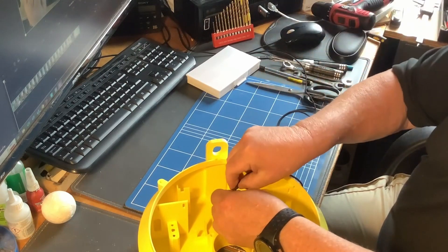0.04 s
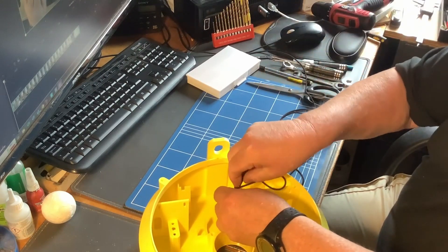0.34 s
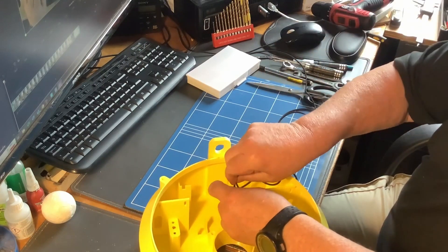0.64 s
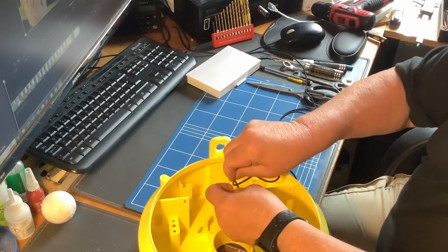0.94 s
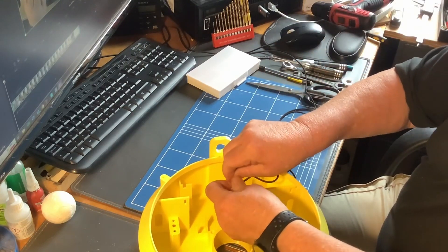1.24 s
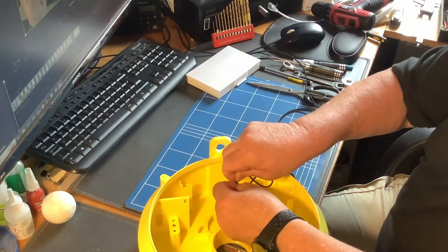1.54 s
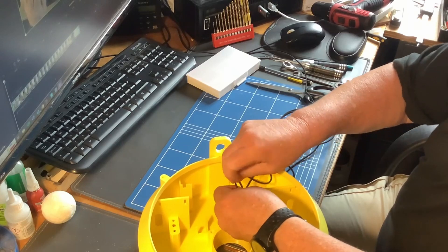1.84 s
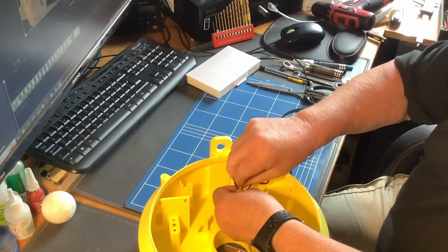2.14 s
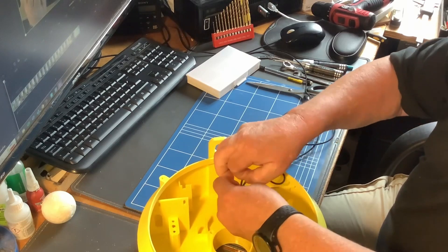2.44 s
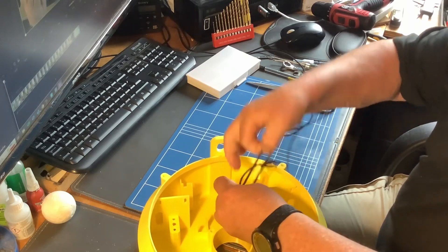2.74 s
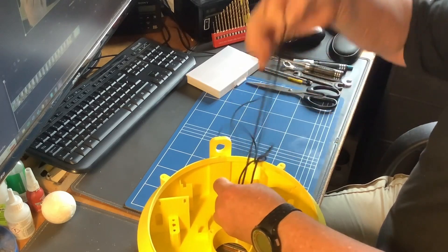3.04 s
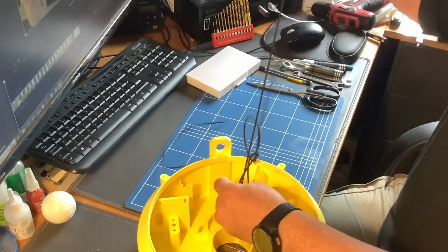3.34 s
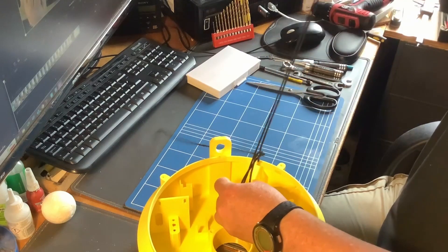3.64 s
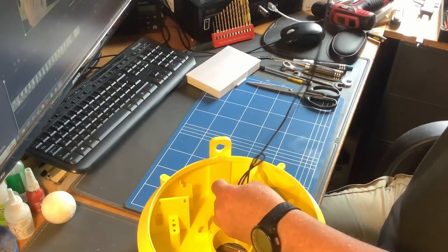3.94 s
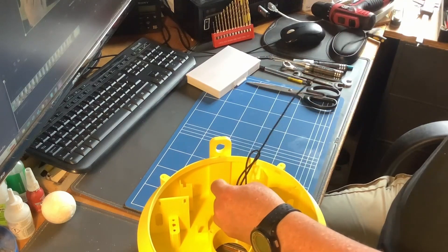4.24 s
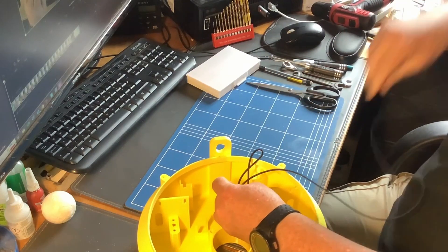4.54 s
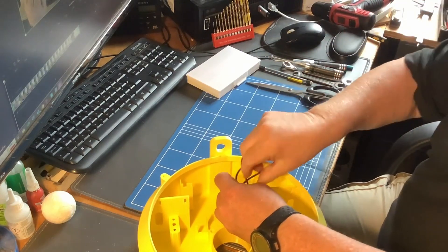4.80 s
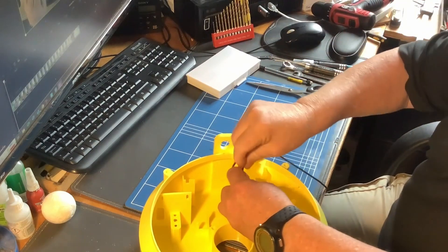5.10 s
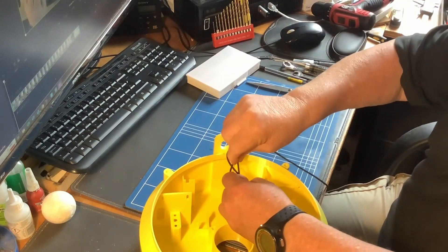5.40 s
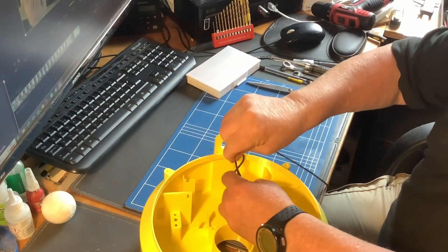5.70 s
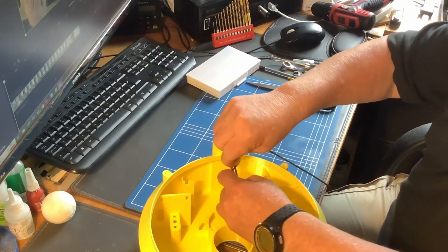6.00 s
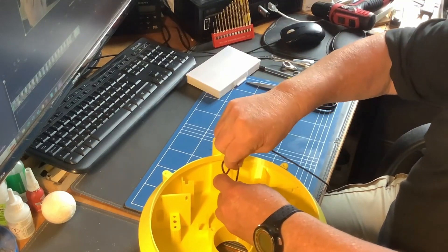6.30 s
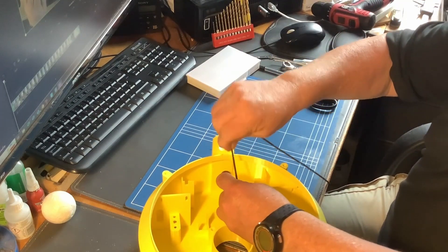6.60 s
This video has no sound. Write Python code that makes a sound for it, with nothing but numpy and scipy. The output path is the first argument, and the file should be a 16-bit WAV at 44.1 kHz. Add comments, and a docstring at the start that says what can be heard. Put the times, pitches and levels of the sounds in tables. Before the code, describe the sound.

In a small, quiet room, a nearby microphone picks up soft handling of a plastic shell, on the left channel only. A stretchy cord scrapes through the shell in one long, jerky pull, bright and raspy with short squeals, and its end taps the plastic several times. Afterwards fingers scuff and rub more quietly, with occasional light ticks and dull thuds as the shell rocks on the desk.

```python
"""A braided bungee cord is fed by hand through a hole in a plastic housing, then hauled through in jerks. The
braid rasps over the edge in tiny slips that ring the bowl-shaped shell, and it squeals briefly when the slips
fall into step. The loose end flicks against the plastic, and the housing bumps on its desk. Fingers rub, scuff
and now and then squeak before and after, in a small quiet room. Only the left channel carries sound."""
import sys
import numpy as np
from scipy import signal
from scipy.fft import rfft, irfft
from scipy.io import wavfile
from scipy.ndimage import uniform_filter1d

SR = 44100
rng = np.random.default_rng(int(sys.argv[2]) if len(sys.argv) > 2 else 0)


def wav_record(signal):
    """Record a signal, one row per channel, as 16-bit PCM in the file named by sys.argv[1]."""
    frames = np.transpose(np.atleast_2d(signal))
    bounded = np.clip(frames, -1, 1)
    # unit amplitude maps onto the largest positive 16-bit level
    quanta = np.round(bounded * 32767).astype(np.int16)
    wavfile.write(sys.argv[1], SR, quanta)


N = 293706
TIME = np.arange(N) / SR
HZ = np.fft.rfftfreq(8192, 1 / SR)

# tone of the braid rasping on the edge: (frequency [Hz], level [dB])
RASP_TONE = [(40, -47.5), (200, -22), (600, -12.5), (950, -10.5), (1300, 2.5), (2000, -0.5), (2500, 3),
             (3300, -1.5), (5500, -4), (6800, -13), (10000, -16), (16000, -26)]
# tone of fibres and hands brushing the plastic: (frequency [Hz], level [dB])
SWISH_TONE = [(40, -11.5), (130, -2.5), (600, -3), (1200, -7.5), (2500, -9), (4000, -7), (5700, -11),
              (7000, -14.5), (10000, -16), (16000, -30)]
# one long haul of the arm, which speeds up and eases off: (time [s], level [dB])
HAUL = [(2.46, -53.5), (2.56, -47), (2.63, -36.5), (2.74, -35.5), (2.82, -32.5), (3.3, -32.5),
        (3.41, -43.5), (3.5, -35), (3.62, -49), (3.83, -52)]


def drag():
    """The braid slips over the edge of the hole and rings the shell, while its fibres hiss past."""
    pull_db = np.interp(TIME, *np.transpose(HAUL), left=-120, right=-120)
    force = slips(N, per_s=1800, spread_db=3) * amp(pull_db - 0.5 + 1.4 * wander(N, hz=60))
    fibres = rng.standard_normal(N) * amp(pull_db - 14)
    rasp = signal.oaconvolve(force, shell(RASP_TONE))
    hiss = signal.oaconvolve(fibres, shell(SWISH_TONE, tilt_db=4.5))
    return (rasp + hiss)[:N]


def jerks():
    """The cord snatches forward, its strands catching and letting go in clumps."""
    # (start [s], length [s], level [dB], pitch of the contact [Hz])
    snatches = [(2.755, 0.022, -27, 5000), (2.792, 0.035, -18.5, 4960), (2.84, 0.049, -28, 5300),
                (2.924, 0.072, -19.5, 2250), (2.978, 0.041, -19.5, 4380), (3.041, 0.0077, -22, 5350),
                (3.084, 0.029, -26.5, 5300), (3.108, 0.041, -19.5, 5310), (3.218, 0.069, -20, 2460),
                (3.305, 0.044, -24, 3620), (3.435, 0.034, -32, 2590), (3.515, 0.039, -22, 3060),
                (3.717, 0.073, -21, 4880), (3.795, 0.029, -23, 3680)]
    out = np.zeros(N)
    for start, length, db, hz in snatches:
        size = int(length * SR)
        catching = amp(1.2 * wander(size, hz=303))
        tilt_db = 0.62 + 0.27 * (db + 25) + 1.32 * (start - HAUL[0][0])  # harder or later is brighter
        ring = shell(RASP_TONE, tilt_db, contact(hz, width_hz=370, lift_db=8))
        strands = slips(size, per_s=3600, spread_db=2)
        add(out, start, stroke(unit(catching * strands), ring, db, taper=0.54))
    return out


def squeals():
    """Now and then the slips fall into step and form a short, unsteady whistle with its octave; the two low
    ones are fingers squeaking on the plastic."""
    # (start [s], length [s], rate of slips [Hz], level [dB])
    whistles = [(2.211, 0.056, 778, -50), (2.803, 0.038, 2445, -16), (2.918, 0.036, 2387, -17),
                (2.993, .032, 2430, -15.5), (3.133, 0.024, 2078, -18), (3.213, .02, 577, -34),
                (3.259, 0.035, 2416, -20.5), (3.538, 0.014, 2443, -23), (3.737, 0.0081, 2460, -16.5),
                (3.764, 0.016, 2462, -18), (3.801, 0.0059, 2400, -12.5)]
    out = np.zeros(N)
    for start, length, hz, db in whistles:
        size = int(length * SR)
        phase = 2 * np.pi * np.cumsum(hz * (1 + 0.043 * wander(size, hz=501))) / SR
        whistle = np.sin(phase) + amp(-15) * np.sin(2 * phase)
        add(out, start, amp(db) * unit(whistle) * np.hanning(size))
    return out


def slips(size, per_s, spread_db):
    """The force of rubbing: tiny slips at random moments, a few much larger than the rest."""
    sizes = amp(spread_db * np.minimum(rng.exponential(1, size), 3)) * rng.choice([-1, 1], size)
    return unit(sizes * (rng.random(size) < per_s / SR))


def stroke(force, ring, db, taper):
    """A short force swells and fades, ringing the shell."""
    swell = signal.windows.tukey(len(force), np.clip(taper, 0, 1))
    return amp(db) * signal.fftconvolve(force * swell, ring)


def contact(hz, width_hz, lift_db):
    """The place of contact favours one band of pitches; gives the boost in dB."""
    return lift_db / (1 + (2 * (HZ - hz) / width_hz) ** 2)


def shell(tone, tilt_db=0, contact_db=0, ringing=1):
    """The plastic shell rings under a force; sharper contact adds treble (tilt_db per octave)."""
    # pitches at which the shell rings: (frequency [Hz], width [Hz], boost at full ringing [dB])
    resonances = [(470.4, 28, 8), (540, 15, 6), (813, 59, 10.5), (1116, 11.7, 13.5), (1222, 22, 9.5),
                  (1343, 16, -2.5), (1438, 24, 9.5), (1745, 51, 5.5), (1970, 7, 8), (2072, 78, 5),
                  (2200, 30, 6), (2480, 164, 6), (2760, 30, 2), (3076, 30, -1), (3128, 35, 5.5),
                  (3646, 40, 4.5), (3640, 26, 8), (4070, 72, 3.5), (4944, 27, 5), (5290, 36, 6),
                  (5880, 96, 5)]
    peaks = sum((amp(ringing * db) ** 2 - 1) / (1 + (2 * (HZ - hz) / width) ** 2)
                for hz, width, db in resonances)
    peaks_db = 10 * np.log10(np.maximum(1 + peaks, .1))
    octaves = np.log2(np.maximum(HZ, 500) / 500)
    return response(read(tone, HZ) + peaks_db + tilt_db * octaves + contact_db)


def taps():
    """Each tap of cord or fingernail rattles among the ribs, knocks the bowl and has its own echoes."""
    # (time [s], level [dB], brightness [dB per octave], time to fade by 60 dB [s], bowl knock [dB])
    hits = [(.094, -57, 4, .044, 7), (.114, -49, 11, .025, 9), (.147, -36.5, 5, 0.02, 3.5),
            (.17, -41, -1, .041, 6), (.645, -49, 10, 0.022, 10), (2.039, -55, -11, 0.073, 4),
            (2.101, -42, 3.5, 0.024, -11), (2.159, -48.5, 3, 0.023, 0.5), (2.379, -39.5, 0, 0.084, -2.5),
            (2.468, -42, 2, 0.031, -1), (2.501, -31.5, -2.5, 0.02, -3.5), (2.601, -33.5, 1.5, 0.054, -6),
            (2.958, -24, 4, 0.023, -33), (3.677, -47, -6, .045, -3), (3.71, -30.5, 0.5, 0.1, -24),
            (3.7864, -18.5, 12.5, 0.015, -27), (3.802, -24, 0.5, 0.053, -16), (3.936, -31, 4, 0.026, -5.5),
            (4.0275, -24.5, 0, 0.026, -9.5), (4.226, -44.5, -1, .06, -13), (4.579, -45.5, 6.5, 0.2, -6),
            (4.755, -35, 4, 0.059, -5), (5.474, -43.5, 4.5, 0.058, -6.5), (5.702, -50.5, 1, 0.056, -16),
            (6.215, -55, -3.5, 0.045, 3.5), (6.378, -48, 23.5, 0.039, -28.5)]
    # tone of a tap: (frequency [Hz], level [dB])
    tick_tone = [(40, -37.5), (200, -12), (400, -12), (750, -11), (1000, -3.5), (1400, 1.5), (3000, 1),
                 (5500, -6), (7000, -12), (11000, -20), (16000, -32.5)]
    rise_s = 0.0032  # the soft cord takes a moment to press home
    out, t = np.zeros(N), TIME[:SR // 12]
    for start, db, tilt_db, fade_s, knock_db in hits:
        blow = rng.choice([-1., 1.], len(t)) * (1 - np.exp(-t / rise_s)) * amp(-60 * t / fade_s)
        ring = signal.fftconvolve(blow / np.linalg.norm(blow), shell(tick_tone, tilt_db, ringing=.2))
        add(ring, .002, amp(knock_db) * bowl(uneven_db=2, damping=1.4))  # the bowl answers just after
        tap = amp(db) * ring / np.std(ring[:SR // 100])
        add(out, start, room(tap, early_db=1.5, early_fade_s=0.039, late_db=-6.5))
    return out


def bowl(damping, uneven_db=0):
    """The whole bowl knocks hollowly; uneven_db varies its mix of tones with the place struck."""
    # tones of the bowl: (frequency [Hz], level [dB], time to fade by 60 dB before damping [s])
    tones = [(364, -11.5, 0.18), (444.5, -8, 0.15), (595, -11.5, .06), (725.8, -5, 0.15),
             (805.6, -7.5, 0.13), (1211, -5.5, 0.13), (1317, 2, 0.061), (1862, -4, 0.09), (2268, -8, 0.048),
             (3092, -7.5, 0.028)]
    t = TIME[:len(HZ)]
    place_db = uneven_db * rng.standard_normal(len(tones))
    ring = np.zeros(len(t))
    for k, (hz, db, fade_s) in enumerate(tones):
        fade = amp(db + place_db[k] - 60 * damping * t / fade_s)
        ring += (-1) ** k * fade * np.sin(2 * np.pi * hz * t)  # neighbouring tones swing opposite ways
    return ring / np.linalg.norm(ring)


def scuffs():
    """Hand and cord brush quickly over the plastic."""
    # (start [s], length [s], level [dB], brightness [dB per octave], pitch of the contact [Hz])
    brushes = [(0.138, 0.025, -48.5, 0, 1230), (.255, 0.041, -51.5, -9, 495),
               (2.385, 0.033, -42.5, -4, 750), (4.747, 0.053, -33.5, 2.5, 628), (4.767, .011, -19, 6, 5650),
               (4.797, 0.087, -40, 2.5, 2290), (5.002, 0.018, -41, 5.5, 5630),
               (5.03, 0.043, -44, -0.5, 1106), (5.075, 0.03, -40, 3.5, 3160)]
    out = np.zeros(N)
    for start, length, db, tilt_db, hz in brushes:
        ring = shell(SWISH_TONE, tilt_db, contact(hz, width_hz=0.15 * hz, lift_db=12))
        force = slips(int(length * SR), per_s=4000, spread_db=5.5)
        add(out, start, stroke(force, ring, db, taper=0.23))
    return out


def fingers(pressure):
    """Skin rubs dully on the shell and stirs the bowl while the fibres of the braid crackle above it."""
    # rubs of fingers and cord: (start [s], length [s], level [dB], crackle relative to that level [dB])
    rubs = [(0, 0.056, -54, 9), (0.124, 0.074, -44.5, 2), (0.236, 0.15, -52.5, 0), (0.423, .1, -45, -5.5),
            (0.476, 0.068, -57.5, 7.5), (0.633, 0.04, -50, -9), (1.157, 0.054, -63, -12),
            (1.349, 0.055, -51.5, -11), (1.723, 0.053, -77, -3), (2.1, 0.15, -56.5, 2),
            (2.357, 0.15, -41.5, -12), (4.45, 0.08, -42, 4.5), (4.797, 0.18, -42.5, 5.5),
            (4.961, 0.097, -44.5, 0), (5.07, 0.055, -42, -5), (5.186, 0.18, -53, -2.5),
            (5.411, 0.12, -54.5, -2), (5.68, 0.13, -60, -8), (5.763, 0.3, -47, -21), (5.993, 0.078, -64, 8),
            (6.196, 0.067, -47.5, -14.5), (6.526, 0.15, -56, 6.5)]
    # tone of skin on plastic: (frequency [Hz], level [dB])
    skin_tone = [(40, -22), (150, -9), (400, -2.5), (750, -2), (1000, -6.5), (1500, -0.5), (2400, -7.5),
                 (4000, -16), (5800, -37), (7000, -61), (16000, -24)]
    rub, fibres = pressure.copy(), amp(-1.5) * pressure
    for start, length, db, crackle_db in rubs:
        swell = np.sin(np.pi * np.linspace(0, 1, int(length * SR)) ** 0.56) ** 2  # fast rise, slow fade
        add(rub, start, amp(db) * swell)
        add(fibres, start, amp(db + crackle_db) * swell)
    dull = signal.oaconvolve(rub * slips(N, per_s=1200, spread_db=5), shell(skin_tone))
    hollow = signal.oaconvolve(rub * slips(N, per_s=1200, spread_db=4), bowl(damping=1.4))
    crackle = signal.oaconvolve(fibres * slips(N, per_s=1000, spread_db=4), shell(SWISH_TONE, tilt_db=1))
    return (amp(-5) * dull + amp(-8.5) * hollow + amp(-5) * crackle)[:N]


def grip():
    """The hands press unevenly while they hold housing and cord."""
    # spells of shifting grip: (start [s], end [s], level [dB])
    spells = [(0, 0.718, -68), (1.693, 4.484, -64), (4.41, 6.11, -59.5), (6.134, 6.664, -68.5)]
    held = sum(amp(db) * ((TIME >= start) & (TIME < end)) for start, end, db in spells)
    return uniform_filter1d(held, size=2000) * amp(4 * wander(N, hz=16))


def bumps():
    """The housing rocks on the desk, which gives a low, soft thud."""
    # (time [s], level [dB], pitch [Hz])
    thuds = [(0.819, -49.5, 98), (1.699, -53.5, 109), (2.098, -49.5, 130), (2.77, -40.5, 96.7),
             (4.747, -47.5, 129), (4.75, -44.5, 213), (5.222, -48, 85.3), (5.631, -43, 94.5),
             (5.861, -46.5, 90), (6.389, -50.5, 90.05)]
    out, t = np.zeros(N), TIME[:SR // 3]
    rise_s = 0.029
    swell = (t / rise_s * np.exp(1 - t / rise_s)) ** 2
    for start, db, hz in thuds:
        cycles = np.cumsum(hz * (1 + .1 * wander(len(t), hz=38.4))) / SR
        add(out, start, amp(db - 1) * swell * np.sin(2 * np.pi * cycles))
    return out


def desk(pressure):
    """The shifting grip makes the desk top murmur around its own low pitch."""
    pitch_hz, width_hz = 95, 27
    off_pitch = (HZ ** 2 - pitch_hz ** 2) / (width_hz * (HZ + 1))
    ring = response(-10 * np.log10(1 + off_pitch ** 2))
    return amp(-1.5) * signal.oaconvolve(pressure * rng.standard_normal(N), ring)[:N]


def room(sound, early_db, early_fade_s, late_db):
    """Desk and clutter scatter the sound at once; the walls add a short tail of echoes."""
    # ring of the room: (frequency [Hz], time to fade by 60 dB [s])
    fade_times = [(250, 0.37), (700, 0.16), (1700, 0.19), (4600, 0.16), (12000, 0.15)]
    age = TIME[:SR // 2]
    early, late = rng.choice([-1., 1.], (2, len(age))) * (rng.random((2, len(age))) < 4000 / SR)
    early = early * amp(-60 * age / early_fade_s)
    hz, t, bands = signal.stft(late * (age > .008), SR, nperseg=256)
    fades = amp(-60 * t / read(fade_times, hz)[:, None])
    late = signal.istft(bands * fades, SR, nperseg=256)[1][:len(age)]
    echoes = (age == 0) + amp(early_db) * early / np.linalg.norm(early)
    echoes += amp(late_db) * late / np.linalg.norm(late)
    power = uniform_filter1d(abs(rfft(echoes, 2 * len(HZ) - 2)) ** 2, size=15)
    echoes = signal.fftconvolve(echoes, response(-10 * np.log10(power)))  # evens out their tone
    return signal.oaconvolve(sound, echoes / np.linalg.norm(echoes))[:N]


def room_tone():
    """The quiet room has a low, steady hush with a thin hiss."""
    # (frequency [Hz], level [dB])
    hush_tone = [(25, -28), (50, 1.5), (120, 5.5), (280, -4.5), (400, -4), (670, -10.5), (790, -6),
                 (920, -12.5), (1200, -13), (1900, -18.5), (2500, -25), (6200, -28), (8000, -25),
                 (15500, -24)]
    noise = rng.standard_normal(N + len(HZ) - 1)
    hush = signal.oaconvolve(noise, response(read(hush_tone, HZ)), "valid")
    return amp(-61.5 + .7 * wander(N, hz=14)) * hush


def amp(db):
    """Turns decibels into a gain."""
    return 10 ** (np.asarray(db) / 20)


def unit(x):
    """Scales a signal to an average power of 1."""
    return x / np.sqrt(np.mean(x ** 2) + 1e-20)


def read(points, hz):
    """Reads between (frequency [Hz], value) points, with octaves evenly spaced."""
    f, value = np.transpose(points)
    return np.interp(np.log(hz + 1), np.log(f + 1), value)


def add(mix, start, sound):
    """Lays a sound into the mix at start seconds."""
    part = mix[max(round(start * SR), 0):][:len(sound)]
    part += sound[:len(part)]


def wander(size, hz):
    """A smooth random drift that changes up to about hz times a second."""
    f = np.fft.rfftfreq(size, 1 / SR)
    return unit(irfft(rfft(rng.standard_normal(size)) * np.exp(-(f / hz) ** 2), size))


def response(db):
    """How a filter with these gains over HZ rings after one click, scaled to energy 1."""
    log_gain = np.log(amp(np.r_[db, db[-2:0:-1]]))
    ring = np.fft.ifft(np.exp(np.conj(signal.hilbert(log_gain)))).real[:len(HZ)]
    return ring / np.linalg.norm(ring)


def scene():
    """All sounds reach one microphone on the left channel."""
    pressure = grip()
    friction = drag() + jerks() + scuffs() + fingers(pressure)
    friction = room(friction, early_db=0.5, early_fade_s=0.068, late_db=-5)
    whistle = room(squeals(), early_db=-1, early_fade_s=0.026, late_db=-10.5)
    left = friction + taps() + whistle + bumps() + desk(pressure) + room_tone()
    return np.array([2 * left, np.zeros(N)])


def record(dry):
    """The recorder thins the deep bass, clips peaks near full scale and cuts the highest treble."""
    thinned = signal.sosfilt(signal.butter(3, 38, "high", fs=SR, output="sos"), dry)
    clipped = np.clip(thinned, -.93, .93)
    low_pass = signal.firwin(511, 15950, window=("kaiser", 9), fs=SR)
    return signal.oaconvolve(clipped, low_pass[None], "same", axes=1)


dry = scene()
out = record(dry)
wav_record(out)
```